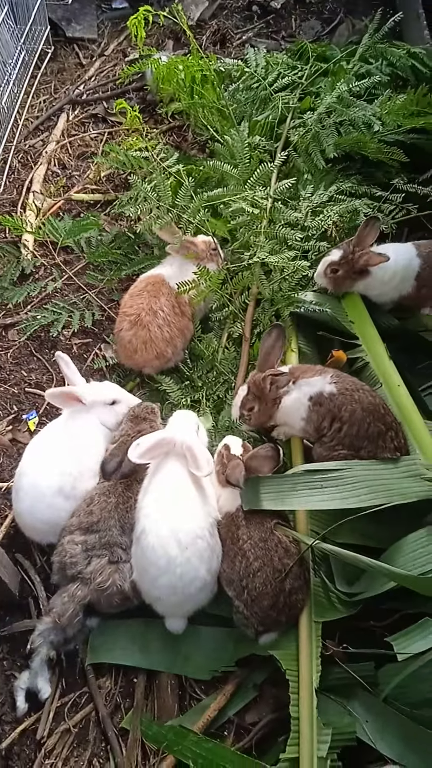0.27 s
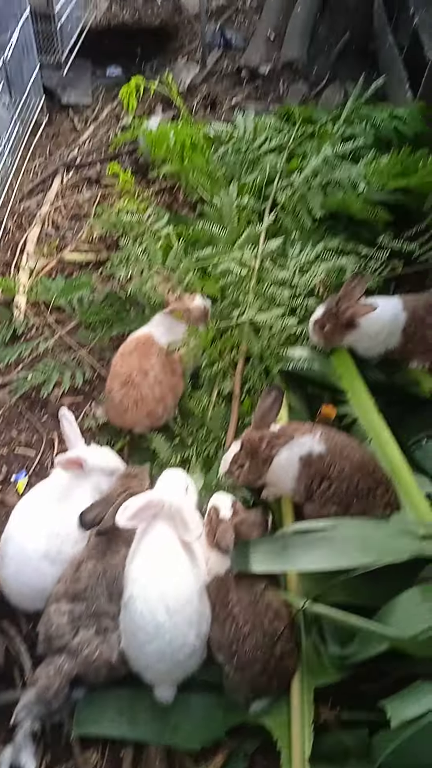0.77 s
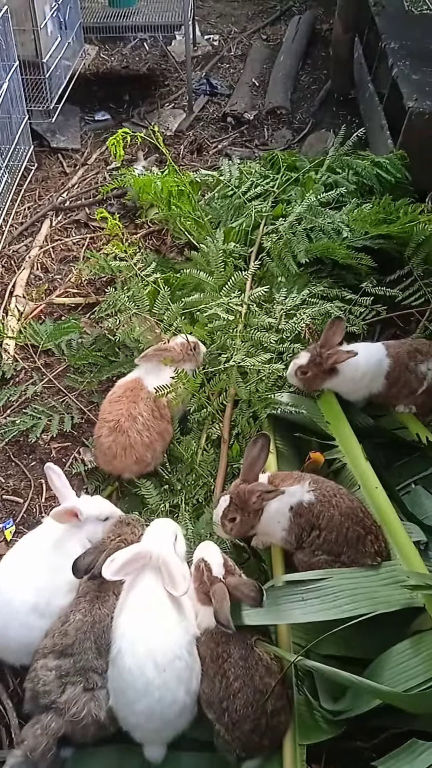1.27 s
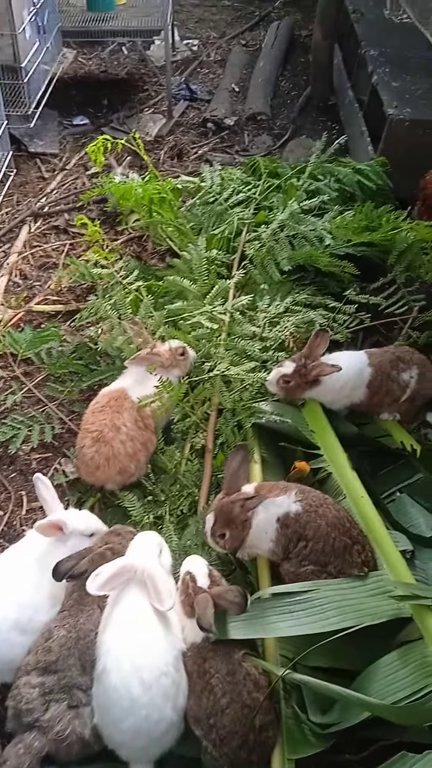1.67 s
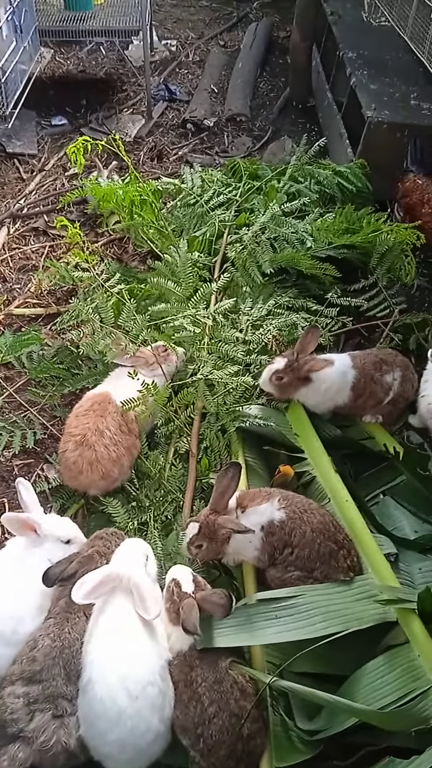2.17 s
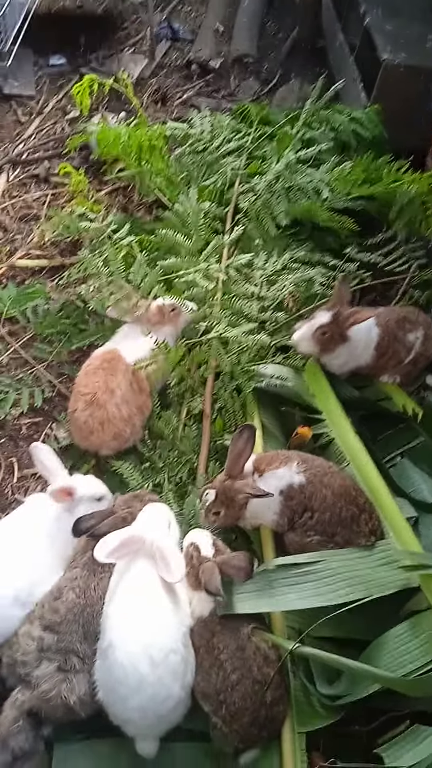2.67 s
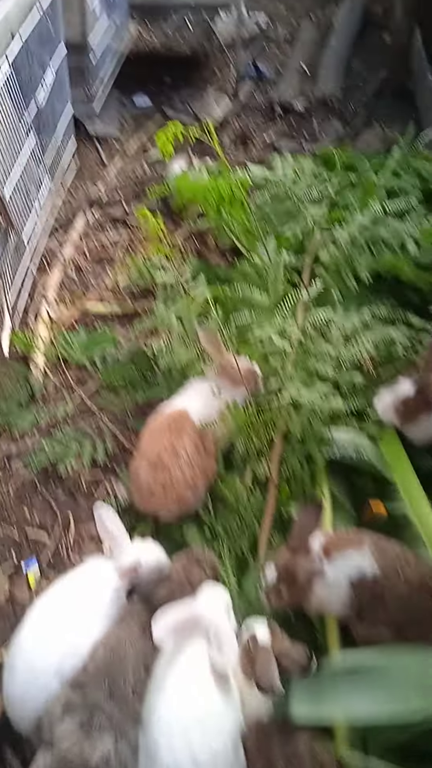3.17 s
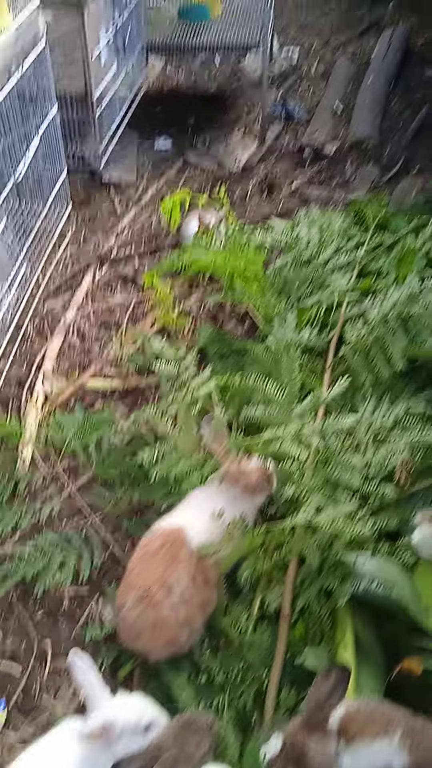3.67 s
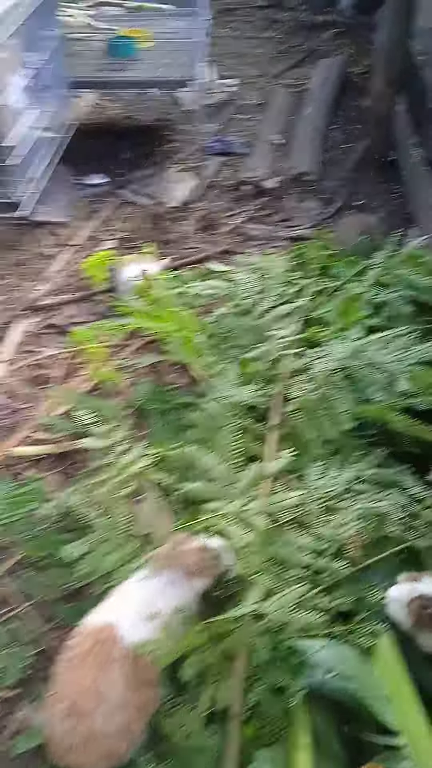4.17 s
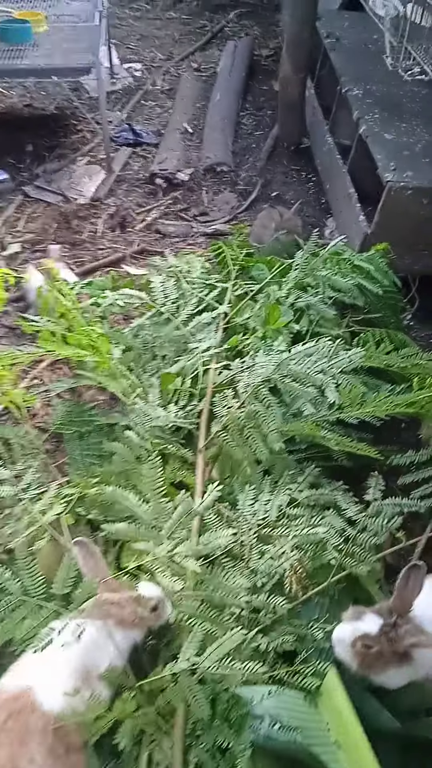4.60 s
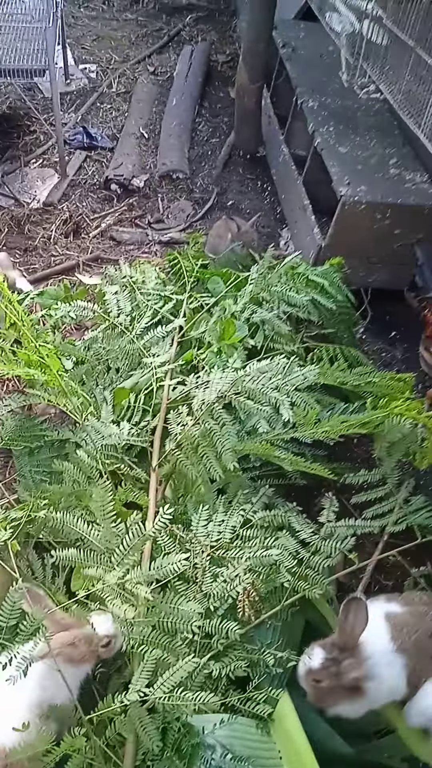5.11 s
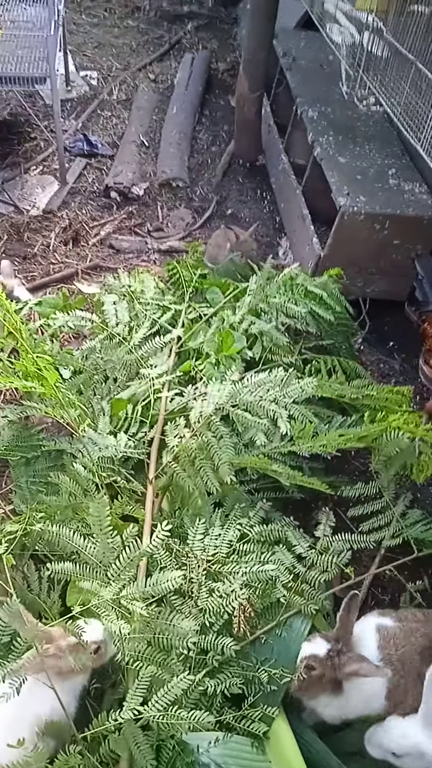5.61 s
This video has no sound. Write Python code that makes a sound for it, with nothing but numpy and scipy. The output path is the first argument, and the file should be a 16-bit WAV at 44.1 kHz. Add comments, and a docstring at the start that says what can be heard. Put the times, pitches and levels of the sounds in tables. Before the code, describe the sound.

Outdoor yard, low soft hush with a faint steady hum. Isolated bright bird cheeps, two close and loud, come in the first half with fainter whistles. From about halfway, rabbits rustle and tug leaves with light knocks; then a loud stalk snap and a dense burst of crunches, easing to faint rustle. Close handheld microphone, short echo from walls and hutches.

```python
"""A small yard: rabbits feed on a heap of fresh branches, near birds cheep, farther ones slur and whistle.
Stalks snap as filtered volleys of fibre clicks; knocks and a hollow tock are damped resonances.
Leaves rustle as clumped clicks and brush as shaped noise; birds are rough harmonic glides mixed with air.
The walls give a short echo; under it all lie shaped noise for the outdoor hush, a faint hum and a whine.
"""
import sys
import numpy as np
from scipy import signal
from scipy.fft import rfft, irfft
from scipy.io import wavfile
from scipy.ndimage import uniform_filter1d

SR = 44100
rng = np.random.default_rng(int(sys.argv[2]) if len(sys.argv) > 2 else 0)


def digitize_waveform(pressure):
    """Quantize a signal to 16-bit integers and store it at the path in sys.argv[1].

    Rows of a 2-D input are taken as channels; values are limited to [-1, 1].
    """
    field = np.atleast_2d(pressure).T
    bounded = np.clip(field, -1, 1)
    quanta = np.round(bounded * 32767).astype(np.int16)
    wavfile.write(sys.argv[1], SR, quanta)


N = 257984
TIME = np.arange(N) / SR
EDGE_HZ = 16100  # upper band edge


def amp(db):
    """Decibels to amplitude gain."""
    return 10 ** (np.asarray(db) / 20)


def unit(x):
    """Scales to an rms of one."""
    return x / np.sqrt(np.mean(x ** 2) + 1e-20)


def read(points, hz):
    """Interpolates a (f/Hz, value) table on a log-frequency axis."""
    f, value = np.transpose(points)
    return np.interp(np.log(hz + 1), np.log(f + 1), value)


def add(mix, start_s, sound):
    """Mixes a sound in at start_s."""
    part = mix[max(round(start_s * SR), 0):][:len(sound)]
    part += sound[:len(part)]


def colour(x, points, size=2048):
    """Minimum-phase filter with the given spectrum: causal, so clicks stay sharp."""
    gain_db = np.maximum(read(points, abs(np.fft.fftfreq(size, 1 / SR))), -90)
    log_gain = np.log(amp(gain_db))
    taps = np.fft.ifft(np.exp(signal.hilbert(log_gain).conj())).real
    return signal.fftconvolve(x, taps)[:len(x)]


def band(x, lo_hz, hi_hz, order=2):
    """Butterworth band-pass."""
    edges_hz = [lo_hz, min(hi_hz, SR / 2 - 1)]
    return signal.sosfilt(signal.butter(order, edges_hz, "band", fs=SR, output="sos"), x)


def noise(points):
    """Steady unit-rms noise with the given spectrum."""
    spectrum = rfft(rng.standard_normal(N))
    return unit(irfft(spectrum * amp(read(points, np.fft.rfftfreq(N, 1 / SR))), N))


def wander(count, rate_hz):
    """Smooth random drift of about unit rms, its spectrum a Gaussian roll-off at rate_hz."""
    size = max(count, SR)
    rolloff = np.exp(-(np.fft.rfftfreq(size, 1 / SR) / rate_hz) ** 2)
    slow = irfft(rfft(rng.standard_normal(size)) * rolloff, size)
    return unit(slow)[:count]


def at_peak(x, db, size=128):
    """Sets the rms of the loudest three milliseconds."""
    return amp(db) * x / np.sqrt(uniform_filter1d(x ** 2, size).max() + 1e-20)


def background(air_db=-71, hiss_db=-78.5, waver=0.12, drift_hz=0.81,
               whine_hz=2150, whine_width_hz=90, drone_waver=0.63):
    """Outdoor hush and hiss as drifting noise; hum and higher tones as wavering sines; a fuzzy whine."""
    # low hush: f/Hz, relative gain/dB
    hush_spectrum = [(15, -44), (25, -26), (97, -4), (144, -5), (192, -5), (216, -12), (243, -8.5),
                     (427, -18), (479, -18), (680, -21), (779, -22.5), (893, -23.5), (1910, -22.5),
                     (2140, -34.5), (2600, -37), (3380, -55.5), (5720, -120)]
    # thin hiss: f/Hz, relative gain/dB
    hiss_spectrum = [(1700, -19), (2300, -4.5), (2700, -5), (4300, -6), (5600, 1.5), (6900, 4), (7700, -11),
                     (11000, -14), (13500, -16.5), (15500, -3)]
    # hum: f/Hz, level/dB
    hum_tones = [(193.8, -69.5)]
    # faint tones over the hum: f/Hz, level/dB
    drone_tones = [(388, -88), (478, -86.5), (775, -91), (1310, -96.5)]
    # thin far-off whine: t/s, level/dB
    whine_levels = [(0, -86.5), (.9, -85.5), (1.8, -83), (3.0, -82), (3.8, -80.5), (4.8, -79), (5.4, -80),
                    (5.85, -81)]

    air = amp(air_db + 0.57 * wander(N, 24)) * noise(hush_spectrum)
    hiss = np.zeros(N)
    for rate_hz in (5, 25):
        hiss += amp(hiss_db + 2.3 * wander(N, rate_hz)) * noise(hiss_spectrum)

    hum = np.zeros(N)
    for hz, db in hum_tones:
        phase = 2 * np.pi * np.cumsum(hz + drift_hz * wander(N, 3)) / SR
        hum += amp(db) * np.sin(phase)
    hum *= 1 + waver * wander(N, 2.9)

    drone = np.zeros(N)
    for hz, db in drone_tones:
        phase = 2 * np.pi * np.cumsum(hz + 5 * wander(N, 16.7)) / SR
        drone += amp(db) * (1 + drone_waver * wander(N, 7.1)) * np.sin(phase)

    turn = 2 * np.pi * whine_hz * TIME
    whine = unit(wander(N, whine_width_hz) * np.cos(turn) + wander(N, whine_width_hz) * np.sin(turn))
    whine *= amp(np.interp(TIME, *np.transpose(whine_levels)))
    return air + hiss + np.sqrt(2) * (hum + drone) + whine  # sqrt(2): sine levels are rms


def pulling(rise_share=0.56, drop_db=20):
    """Gain of the leaf work: steady nibbling plus tugs that build faster than they die, summed as power."""
    # steady chewing: t/s, level/dB
    nibbling = [(0, -84), (2.1, -84.5), (2.6, -69.5), (4.2, -72.5), (5.0, -85.5), (5.85, -74)]
    # tugs: t/s of the hardest pull, level/dB, time to fall by drop_db/s
    tugs = [(.605, -73.5, 0.11), (1.62, -70, 0.18), (3.335, -58, 0.097), (3.663, -49.5, 0.055),
            (4.19, -61.5, 0.17), (4.615, -59.5, 0.15), (5.246, -64, 0.12), (5.4, -68.5, .15),
            (5.66, -70, 0.31)]
    power = amp(np.interp(TIME, *np.transpose(nibbling))) ** 2
    for peak_s, db, fall_s in tugs:
        away = np.maximum((peak_s - TIME) / rise_share, TIME - peak_s) / fall_s
        power = power + amp(db - drop_db * np.minimum(away, 10)) ** 2
    return np.sqrt(power)


def fracture(decay_s, after=0.27, linger=4, size=4096):
    """Fibres tear in a quick volley of random clicks; a few weaker ones follow, linger times slower."""
    t = np.arange(size) / SR
    fibres = rng.standard_normal(size) * (rng.random(size) < .4)
    return fibres * (np.exp(-t / decay_s) + after * np.exp(-t / (linger * decay_s)))


def rustle(crackles_per_s=1500, size_db=2.5, clump_db=3, clump_hz=35):
    """Tiny leaf crackles in clumps, as loud as the leaves are worked; a few louder ticks stand out."""
    # leaf crackle: f/Hz, relative gain/dB
    leaf_spectrum = [(300, -4.5), (900, 4.5), (2500, -2), (4500, 0), (6400, 10), (8000, -7), (11000, -7),
                     (13500, -13), (15500, 3.5)]
    # crisp leaf ticks: t/s, level/dB, decay time/s
    tick_events = [(.598, -56, 0.031), (2.823, -52, 0.0024), (3.341, -50, 0.0034), (4.122, -56, .002),
                   (4.243, -57, .0017), (5.011, -46, .001), (5.165, -55.5, .0061), (5.204, -54.5, 0.0022)]
    # leaf ticks: f/Hz, relative gain/dB
    tick_spectrum = [(500, -12), (2500, -8), (4800, -20), (6200, 9), (7800, -18), (10000, -15), (12000, -6),
                     (13500, -17), (15500, 2)]
    happens = rng.random(N) < crackles_per_s / SR
    sizes = amp(size_db * np.minimum(rng.exponential(1, N), 4))
    clicks = happens * rng.choice([-1, 1], N) * sizes
    clumps = amp(clump_db * np.clip(wander(N, clump_hz), -2, 2))
    out = unit(colour(clicks * clumps, leaf_spectrum)) * pulling()
    for start_s, db, decay_s in tick_events:
        add(out, start_s, at_peak(colour(fracture(decay_s), tick_spectrum), db))
    return out


def syrinx(hz, rough, harmonics_db, rasp_db, jitter=0.066, flutter_hz=700, shimmer=0.19):
    """A bird's membrane: a few harmonics, which flutter and mix with rushing air when the voice is rough."""
    # air in a hoarse call: f/Hz, relative gain/dB
    rasp_spectrum = [(1200, 6.5), (2500, -11.5), (5000, -1.5), (6500, -14), (8000, -7), (11000, 15.5),
                     (14000, -13), (16000, -14.5)]
    count = len(hz)
    flutter = jitter * rough * (.5 + rough) * wander(count, flutter_hz)
    phase = 2 * np.pi * np.cumsum(hz * (1 + flutter)) / SR
    tone = np.zeros(count)
    for k, db in enumerate(harmonics_db, 1):
        tone += amp(db) * np.sin(k * phase) * (k * hz < EDGE_HZ)
    air = amp(rasp_db) * rough ** 2 * unit(colour(rng.standard_normal(count), rasp_spectrum))
    return np.sqrt(2) * tone * (1 + shimmer * rough * wander(count, flutter_hz)) + air


def swell(u, loudest, onset_db, end_db):
    """Level in dB through a note: up to its loudest point, then down."""
    return np.interp(u, [0, np.clip(loudest, .05, .95), 1], [onset_db, 0, end_db])


def cheeps(onset_db=-17, end_db=-12, arch=.11, crest=.35, purity=0.36,
           fourth_db=-3, fifth_db=-14, rasp_db=-25):
    """Cheeps swell, arch over in pitch and turn hoarse; the louder, the more the second harmonic leads."""
    # near cheeps: t/s, length/s, crest pitch/Hz, peak level of the 2nd harmonic/dB,
    # fundamental re 2nd/dB, 3rd harmonic re 2nd/dB (both at the loudest point),
    # mid-note roughness/1, loudest point/share of length
    cheep_notes = [(.085, 0.1, 3495, -43, -2, -17, 0.4, 0.1),
                   (.204, 0.048, 3290, -41, -8.5, -17, 0.5, 0.46),
                   (1.073, .056, 3229, -21, -22, -26, 0.17, 0.91),
                   (2.43, 0.061, 2943, -25, -13, -23, .2, 0.56), (2.59, 0.013, 2685, -51, -16, -32, .3, .4),
                   (2.793, 0.079, 3394, -59.5, -1.5, -11, .28, 0.62),
                   (3.196, .055, 2930, -21.5, -42.5, -33, 0.55, .2),
                   (4.084, 0.067, 3306, -51.5, -8, -24, 0.25, 0.42),
                   (5.74, 0.12, 3270, -59, -3, -28, 0.29, 0.18)]
    out = np.zeros(N)
    for start_s, length_s, crest_hz, db, first_db, third_db, rough, loudest in cheep_notes:
        u = np.linspace(0, 1, round(length_s * SR))
        effort_db = swell(u, loudest, onset_db, end_db)
        first = first_db - purity * effort_db
        third = third_db - purity * effort_db
        hz = crest_hz * (1 - arch * (u - crest) ** 2)
        harmonics_db = [first, 0, third, third + fourth_db, third + fifth_db]
        voice = syrinx(hz, rough * (.5 + u), harmonics_db, rasp_db)
        add(out, start_s, amp(db + effort_db) * voice * signal.windows.tukey(len(u), .3))
    return out


def bump(db, hz, decay_s, spread=1.32, ring_db=-1, ring_s=0.0023):
    """A damped branch or the ground answers a bump with a brief tone inside a broad resonance."""
    resonance = [(hz / 5, -32), (hz / spread, -12), (hz, 0), (hz * spread, -12), (hz * 3, -34), (hz * 8, -50)]
    thud = colour(fracture(decay_s), resonance)
    t = np.arange(len(thud)) / SR
    ring = np.sin(2 * np.pi * hz * t) * np.exp(-t / ring_s) * (1 - np.exp(-t * hz))
    return at_peak(at_peak(thud, 0) + at_peak(ring, ring_db), db)


def knocks():
    """A light knock sounds one branch; a landing paw shakes all the resonances of the heap."""
    # dull knocks of branches and paws: t/s, level/dB, f/Hz, decay time/s
    knock_events = [(.33, -62.5, 540, .012), (2.351, -54.5, 1650, .005), (3.119, -54.5, 1470, 0.0075),
                    (3.389, -55, 212, 0.0033), (3.686, -62.5, 1620, 0.0097), (4.239, -54, 766, 0.0013),
                    (4.336, -39.5, 1270, .003), (4.34, -49, 896, 0.0042), (4.961, -42, 947, 0.0057),
                    (5.004, -46.5, 387, .0035), (5.22, -56.5, 1216, 0.014), (5.56, -64.5, 1170, 0.011)]
    # paws landing on the heap: t/s, level/dB, decay time/s
    thump_events = [(2.7, -45.5, 0.0034), (5.391, -59, 0.015)]
    # heap resonances: f/Hz, level re the thump/dB
    heap_modes = [(255, -3.5), (650, 1.5), (1030, -1.5)]
    out = np.zeros(N)
    for start_s, db, hz, decay_s in knock_events:
        add(out, start_s, bump(db, hz, decay_s))
    for start_s, db, decay_s in thump_events:
        for hz, mode_db in heap_modes:
            add(out, start_s, bump(db + mode_db, hz, decay_s))
    return out


def slurs(onset_db=-12, end_db=-8, brighten=0.41, third_db=-2, upper_db=-12):
    """Whistles and raspy scolding notes: each one bowed glide, swelling and fading, brightest where loudest."""
    # slurred notes: t/s, length/s, start/Hz, end/Hz (both before the bow), bow/share of pitch,
    # peak level of the fundamental before the throat/dB, 2nd harmonic re fundamental there/dB,
    # roughness/1, loudest point/share of length
    slur_notes = [(.41, 0.077, 3490, 3290, -0.0057, -78, -29, 0.25, .4),
                  (0.844, 0.041, 3690, 3520, .01, -68, -19, 0.21, 0.27),
                  (1.36, 0.049, 4540, 4980, 0.097, -61.5, -19, 0.44, 0.3),
                  (1.429, .09, 4540, 4280, -0.011, -66, -28, 0.27, .35),
                  (2.012, 0.051, 5520, 5250, -0.024, -69, -28, 0.17, 0.48),
                  (2.057, 0.044, 3690, 4280, 0.01, -68, -5.5, 0.44, 0.66),
                  (2.099, 0.025, 4134, 3970, 0.033, -48.5, -6.5, .27, 0.89),
                  (2.123, .038, 4180, 1549, -0.16, -52, 6.5, 0.5, 0.42),
                  (2.741, 0.057, 3440, 3680, 0.28, -66.5, -30, 0.25, 0.077),
                  (2.816, 0.021, 4940, 5410, -0.018, -60.5, -22, 0.18, .4),
                  (3.131, .075, 1823, 2200, .09, -48.5, -0.5, 0.3, .75),
                  (3.19, 0.031, 2300, 2270, -0.02, -52.5, 1, 1.03, 0.21),
                  (3.362, 0.0303, 1966, 2350, -0.0075, -55, -10, 0.83, 0.74),
                  (3.378, 0.0703, 3200, 3273, -0.018, -57.5, 0, 0.42, 0.34),
                  (3.398, 0.042, 3966, 3960, 0.0063, -58, -4.5, .7, 0.3),
                  (4.149, 0.061, 3274, 1712, 0.075, -65, -2, 0.63, 0.089),
                  (5.565, 0.024, 2950, 3190, -.01, -72.5, -21, 0.23, 0.22),
                  (5.589, 0.044, 3330, 4360, .15, -68.5, -20, .3, 0.47)]
    out = np.zeros(N)
    for start_s, length_s, start_hz, end_hz, bow, db, second_db, rough, loudest in slur_notes:
        u = np.linspace(0, 1, round(length_s * SR))
        hz = (start_hz + (end_hz - start_hz) * u) * (1 + bow * np.sin(np.pi * u))
        effort_db = swell(u, loudest, onset_db, end_db)
        second = second_db + brighten * effort_db
        harmonics_db = [0, second, second + third_db] + [second + upper_db] * 3
        voice = syrinx(hz, rough, harmonics_db, rasp_db=5.5, jitter=.11)
        add(out, start_s, amp(db + effort_db) * voice * signal.windows.tukey(len(u), .12))
    return colour(out, [(1000, -10), (6800, 4), (8500, -10), (15000, -19)])  # the throat dulls the top


def scuffs(spread=1.3):
    """Leaves brush softly against fur and ground: swells of noise around one broad resonance."""
    # t/s, length/s, level before the swell/dB, centre f/Hz
    scuff_events = [(.788, .075, -70.5, 1090), (2.965, 0.075, -69.5, 440), (3.048, 0.027, -60.5, 1460),
                    (3.277, 0.064, -63.5, 1380), (3.448, 0.095, -72, 850), (4.009, 0.061, -72.5, 1030),
                    (4.896, 0.091, -72, 970), (5.097, .12, -70.5, 990), (5.612, 0.07, -69.5, 1000)]
    out = np.zeros(N)
    for start_s, length_s, db, hz in scuff_events:
        count = round(length_s * SR)
        resonance = [(hz / 3, -30), (hz / spread, -10), (hz, 0),
                     (hz * spread, -10), (hz * 3, -34), (hz * 6, -50)]
        brush = colour(rng.standard_normal(count), resonance)
        add(out, start_s, amp(db) * unit(brush) * np.hanning(count))
    return out


def tock(start_s=1.606, level_db=-50):
    """Something small and hollow is tapped once: a few modes ring briefly."""
    # modes: f/Hz, relative level/dB, t60/s
    tock_modes = [(1867, -0.5, 0.051), (3600, -19, .06), (5850, -11, .07), (6971, -17, 0.1)]
    out, t = np.zeros(N), np.arange(SR // 5) / SR
    ring = sum(amp(db - 60 * t / t60_s) * np.sin(2 * np.pi * hz * t) for hz, db, t60_s in tock_modes)
    add(out, start_s, at_peak(ring, level_db))
    return out


def snaps(decay_s=0.0014, first_break=2.3):
    """A stalk gives way at once and its fibres follow: a crack, a woody body and a fine fizz."""
    # stalks and twigs breaking: t/s, crack level/dB, woody body level/dB, fizz level/dB
    snap_events = [(2.3519, -57, -71, -66), (2.6411, -59, -62, -64), (2.6563, -51.5, -58.5, -59),
                   (3.3486, -45.5, -67, -53), (3.4562, -50.5, -61.5, -55), (4.3356, -24.5, -32, -29.5),
                   (4.354, -39, -48, -48), (4.4747, -42, -54.5, -49), (4.4809, -46, -56.5, -47),
                   (4.6977, -37.5, -46, -42.5), (4.7185, -34.5, -41, -39.5), (4.9531, -28, -32, -32.5),
                   (4.9621, -40, -41.5, -47), (4.9704, -32, -43.5, -38), (4.9822, -34.5, -35.5, -35.5),
                   (4.9902, -36.5, -48, -42), (5.004, -31, -41, -33), (5.0626, -42, -54, -42),
                   (5.2156, -51, -63, -55)]
    # breaking stalk: f/Hz, relative gain/dB
    crack_spectrum = [(200, -10.5), (450, -10), (700, -1), (900, 2.5), (1400, 6), (2000, 2.5), (2800, -10),
                      (4500, -7), (6400, 2.5), (8000, 1.5), (11000, -2.5), (13000, -14), (15500, -4.5),
                      (16500, -27)]
    out = np.zeros(N)
    for start_s, crack_db, body_db, fizz_db in snap_events:
        fibres = fracture(decay_s, after=0.15, linger=10.7)
        tear = colour(fibres + first_break * signal.unit_impulse(len(fibres)), crack_spectrum)
        add(out, start_s, at_peak(band(tear, 2330, 7700), crack_db))
        add(out, start_s, at_peak(band(tear, 200, 1940), body_db))
        add(out, start_s, at_peak(band(tear, 9000, 22000), fizz_db))
    return out


def yard(x, early_db, tail_db, spread_s=.022, count=10, size=256):
    """A few hard reflections from ground and hutches, then a short diffuse tail; levels re the direct sound."""
    # echo decay: f/Hz, t60/s
    decay_times = [(200, 0.22), (1000, 0.3), (3000, 0.29), (6300, 0.27), (10000, 0.22), (16000, 0.081)]
    early = np.zeros(SR)
    delay_s = rng.uniform(.003, spread_s, count)
    early[(delay_s * SR).astype(int)] = rng.choice([-1, 1], count) / np.sqrt(delay_s)

    # sparse random taps, decayed per frequency
    taps = rng.choice([-1., 1.], SR) * (rng.random(SR) < 3000 / SR) * (np.arange(SR) > .005 * SR)
    hz, t, z = signal.stft(taps, SR, nperseg=size)
    decay = amp(-60 * t / read(decay_times, hz)[:, None])
    tail = signal.istft(z * decay, SR, nperseg=size)[1][:SR]

    echo = amp(early_db) * early / np.linalg.norm(early) + amp(tail_db) * tail / np.linalg.norm(tail)
    return x + signal.fftconvolve(x, echo)[:N]


def scene():
    """Birds around the yard, feeding close by, and the air."""
    birds = yard(cheeps(), early_db=-6.0, tail_db=-8) + yard(slurs(), early_db=-12.5, tail_db=-3)
    feeding = yard(rustle() + knocks() + scuffs() + tock() + snaps(), early_db=-9.0, tail_db=-14)
    return (birds + feeding + background())[None]


def record(dry):
    """Linear-phase low-pass at the upper band edge."""
    taps = signal.firwin(511, EDGE_HZ, window=("kaiser", 9), fs=SR)
    return signal.oaconvolve(dry, taps[None], "same")


dry = scene()
out = record(dry)
digitize_waveform(out)
```